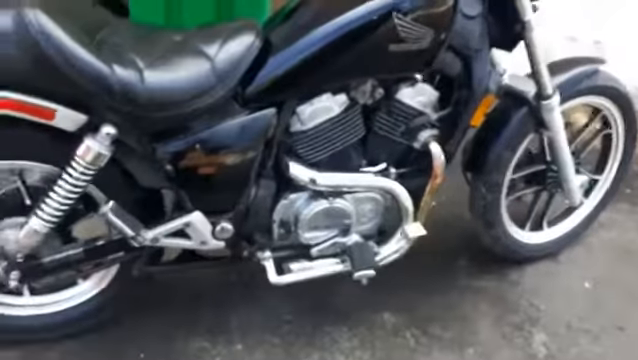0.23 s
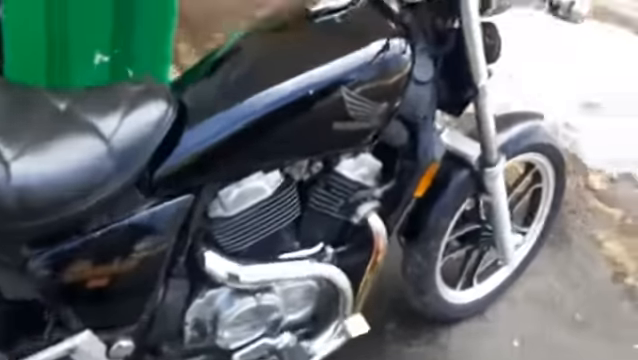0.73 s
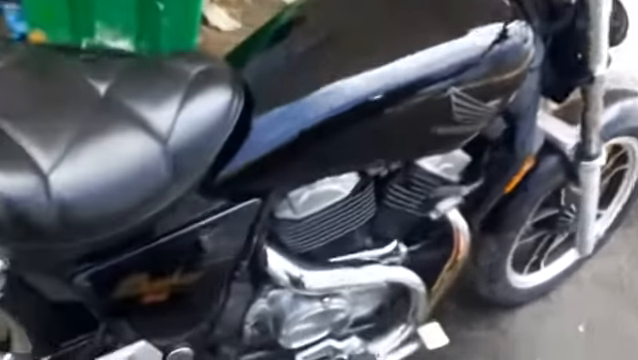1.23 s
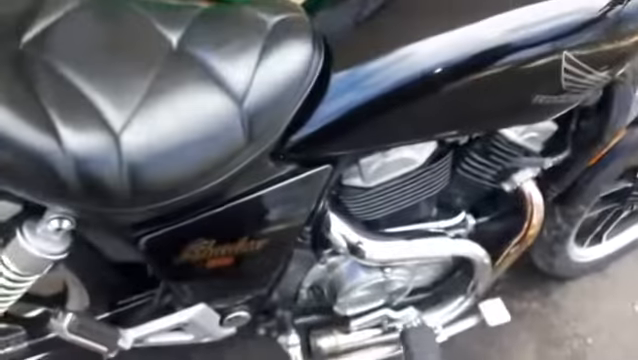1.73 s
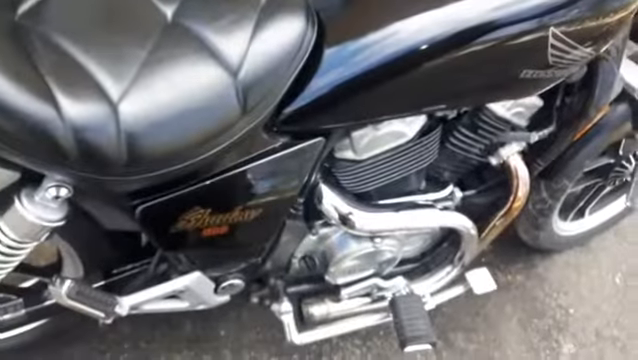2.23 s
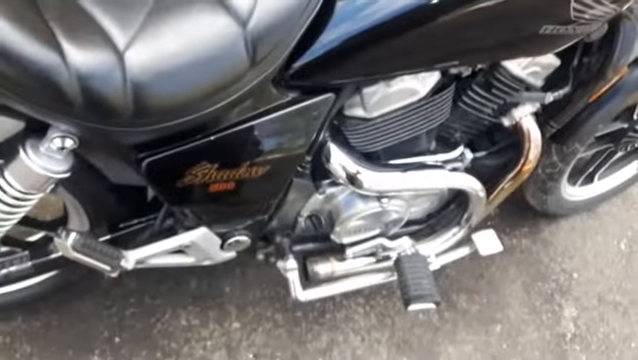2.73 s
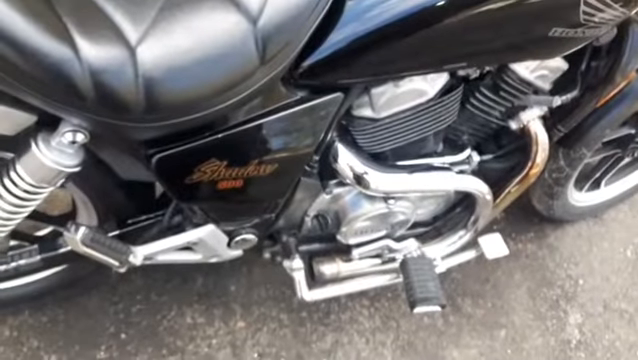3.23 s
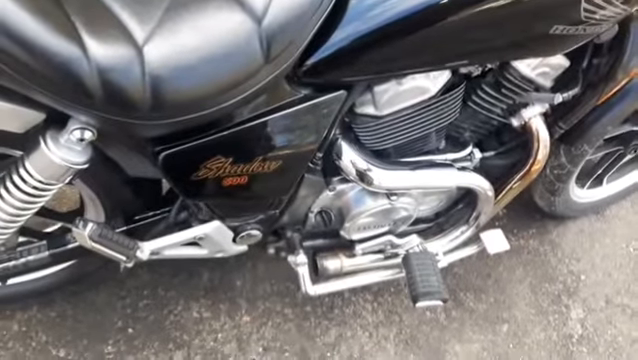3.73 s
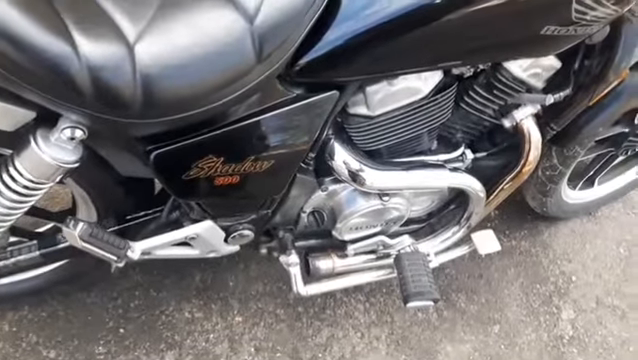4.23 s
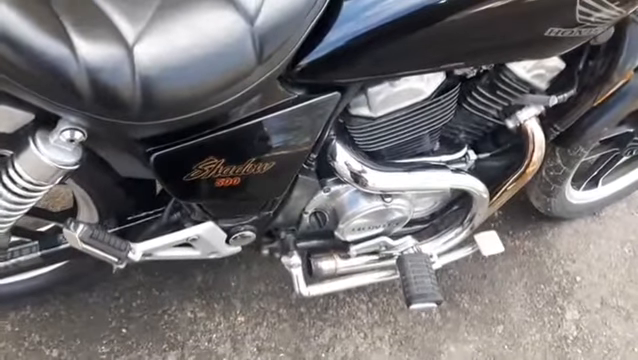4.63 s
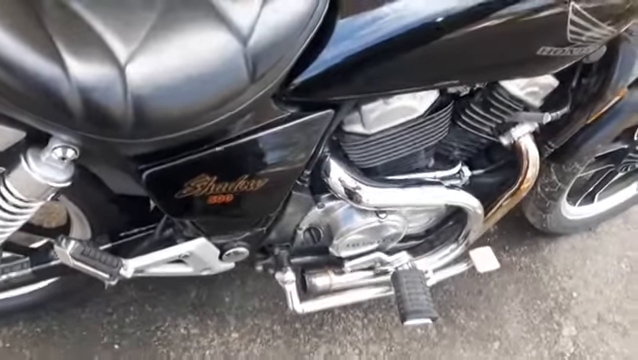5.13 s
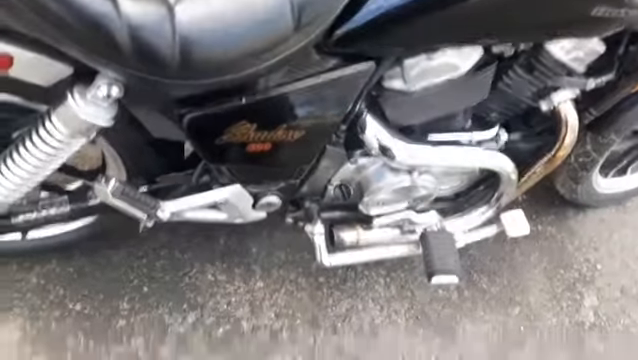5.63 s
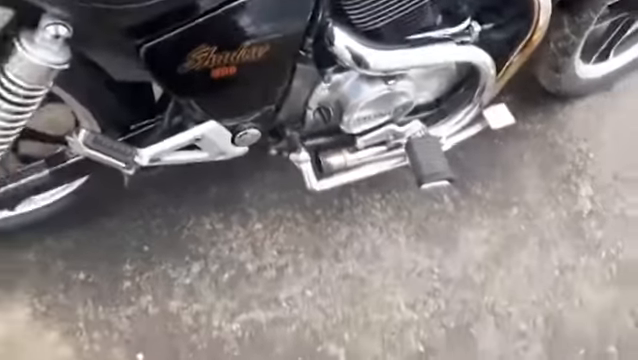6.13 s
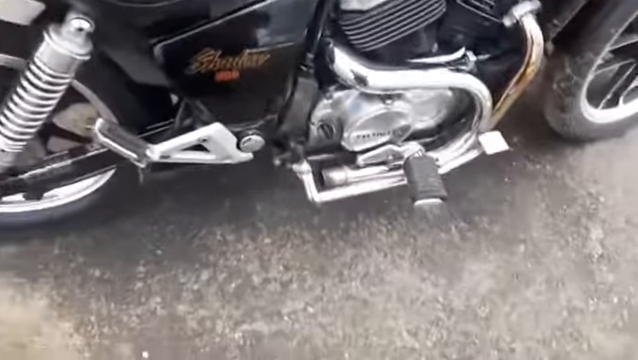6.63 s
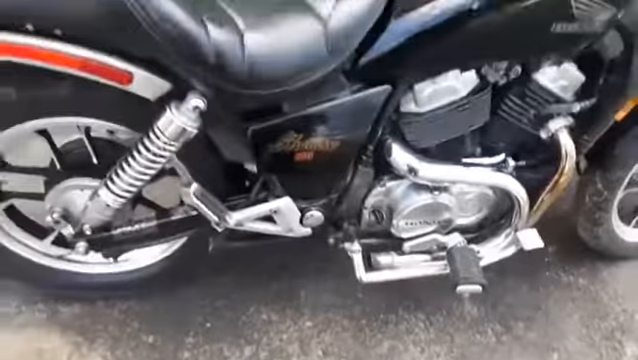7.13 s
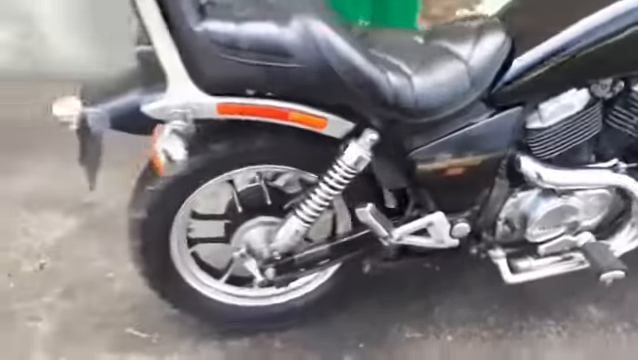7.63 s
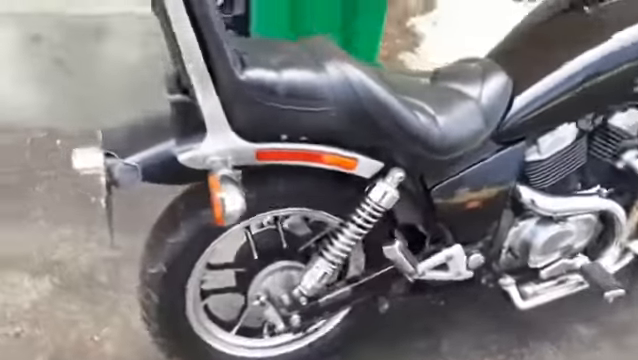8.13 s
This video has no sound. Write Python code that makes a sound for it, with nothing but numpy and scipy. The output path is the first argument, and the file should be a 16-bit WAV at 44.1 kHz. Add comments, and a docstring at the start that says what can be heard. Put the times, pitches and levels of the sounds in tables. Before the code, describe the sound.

A V-twin motorcycle on open pipes idles with a lumpy chug, gets a short throttle blip and one hard crackling rev, then settles back to idle.

```python
"""Outdoors, a V-twin motorcycle on open pipes idles, is blipped, revved once and coasts slowly back to idle.
Two unevenly spaced firings a cycle puff into the ringing pipes; gas hisses past the valves and the valve
gear clatters. Under throttle the puffs steepen into shocks that overload the close microphone, and the pipes
pop as it shuts. Pushes timed by the crank ring damped modes or gate coloured noise; a low rumble lies below."""
import sys
import numpy as np
from scipy import signal
from scipy.io import wavfile
from scipy.ndimage import uniform_filter1d

SR = 44100
rng = np.random.default_rng(int(sys.argv[2]) if len(sys.argv) > 2 else 0)


def wav_record(signal):
    """Record a signal, one row per channel, as 16-bit PCM in the file named by sys.argv[1]."""
    frames = np.transpose(np.atleast_2d(signal))
    bounded = np.clip(frames, -1, 1)
    # unit amplitude maps onto the largest positive 16-bit level
    quanta = np.round(bounded * 32767).astype(np.int16)
    wavfile.write(sys.argv[1], SR, quanta)


N = 369116
T = np.arange(N) / SR


def amp(db):
    """Decibels to gain."""
    return 10 ** (np.asarray(db) / 20)


def noise():
    """White turbulence."""
    return rng.standard_normal(N)


def ramp(x, start, end):
    """Rises from 0 to 1 as x goes from start to end."""
    return np.clip((x - start) / (end - start), 0, 1)


def follow(rows):
    """Each column of a curve table at every sample."""
    s, *columns = np.transpose(rows)
    return [np.interp(T, s, c) for c in columns]


# engine speed: (time [s], four-stroke cycles [1/s])
ENGINE_SPEED = [(0.0, 12.67), (0.9, 12.24), (1.31, 12.62), (1.59, 12.18), (2.05, 12.61), (2.32, 35.31),
                (2.61, 25.36), (2.72, 24.53), (2.9, 39.22), (3.04, 50.76), (3.13, 53.93), (3.41, 41.87),
                (3.67, 33.02), (4.05, 26.9), (5.0, 22.52), (6.24, 15.73), (6.71, 14.92), (8.37, 14.3)]
# twists of the throttle: (opening starts [s], shutting starts [s], afterfire ends [s])
TWISTS = [(2.055, 2.31, 2.563), (2.692, 3.152, 3.70)]
OPEN_S, SHUT_S = 0.069, 0.0488  # time the throttle takes to open and to shut
# cycles/s: coasting gives way to idle between the first two; shocks set in between the last two
IDLE_SPEED, COAST_SPEED, CRACK_SPEED, RIP_SPEED = 14.32, 22.6, 33, 45.5
MID_SPEED = 25  # cycles/s at which the running levels are stated
START_CYCLE, REAR_CYCLE = -.212, .325  # crank at the start; place of the rear firing [cycles]
SKIP_S, SKIP_CYCLES = 1.458, .318  # the sound skips once, about a third of a cycle ahead
LULL_AFTER_S, LULL_WIDTH_S = 0.077, .11  # the pipe note sags and sputters just after the afterfire ends

RATE = follow(ENGINE_SPEED)[0]
THROTTLE = sum(ramp(T, opens, opens + OPEN_S) - ramp(T, shuts, shuts + SHUT_S)
               for opens, shuts, _ in TWISTS)
# running on above idle with the throttle shut
OVERRUN = (1 - THROTTLE) * ramp(RATE, IDLE_SPEED, COAST_SPEED)
IDLING = (1 - THROTTLE) * (1 - OVERRUN)
# shares of coasting puffs and of shocks
COASTING = np.clip(0.13 + 0.68 * OVERRUN, 0, 1)
SHOCKED = np.clip(0.0049 + 0.93 * np.maximum(THROTTLE, ramp(RATE, CRACK_SPEED, RIP_SPEED)), 0, 1)
DRIVEN_SHOCK = SHOCKED * (1 - COASTING)
# at racing speed the separate firings merge into a train of shocks
RACING = ramp(RATE - 6 * THROTTLE, 34, 40)
LULL = sum(np.exp(-((T - ends - LULL_AFTER_S) / LULL_WIDTH_S) ** 2) for _, _, ends in TWISTS)
# the idle is lumpy: the crank runs a little early or late
HUNTING = uniform_filter1d(uniform_filter1d(noise(), size=SR // 10), size=SR // 20)
LUMPY = .005 * HUNTING / HUNTING.std() * (1 - OVERRUN - THROTTLE) ** 2
SKIP = SKIP_CYCLES * ramp(T, SKIP_S - .006, SKIP_S + .006)
# crank position in cycles
CYCLE = START_CYCLE + np.cumsum(RATE) / SR + SKIP + LUMPY


def clicks(s, size):
    """Single-sample pushes at the given times."""
    samples = np.clip(np.round(s * SR).astype(int), 0, N)
    return np.bincount(samples, size * (s > 0), N + 1)[:N]


SPUTTER_DB, SPUTTER_S = 4.5, .0006  # extra unevenness and jitter at the depth of the lull


def beats(place, uneven_db, jitter_s, late_s=0):
    """One push a cycle at a crank position; combustion is less even under throttle and while it sputters."""
    turns = np.arange(np.ceil(CYCLE[0] - place), CYCLE[-1] - place)
    s = np.interp(turns + place, CYCLE, T)
    rougher = 1 + 0.83 * np.interp(s, T, DRIVEN_SHOCK)
    slip, size = rng.standard_normal((len(s), 2)).T * rougher
    sputter = np.interp(s, T, LULL)
    s = s + late_s + (jitter_s + SPUTTER_S * sputter) * slip
    return clicks(s, amp((uneven_db + SPUTTER_DB * sputter) * size))


def die(x, decay_s):
    """Gives every push an exponential tail of unit area."""
    r = np.exp(-1 / (decay_s * SR))
    return signal.lfilter([1 - r], [1, -r], x)


def ring(x, modes, low_hz, high_hz):
    """Damped modes, kept to their own register; a wider mode dies faster."""
    t = T[:SR // 6]
    tone = sum(strength * width * np.exp(-np.pi * width * t) * np.cos(2 * np.pi * hz * t)
               for hz, width, strength in modes)
    register = signal.butter(3, [low_hz, high_hz], "band", fs=SR, output="sos")
    return signal.sosfilt(register, signal.oaconvolve(x, tone)[:N])


def colour(x, points):
    """Causal minimum-phase filter with the given spectrum, falling steeply beyond its ends."""
    hz, db = np.transpose(points)
    octave = np.log2(np.fft.rfftfreq(8192, 1 / SR) + 1)
    inside = np.clip(octave, np.log2(hz[0]), np.log2(hz[-1]))
    db = np.interp(octave, np.log2(hz), db) - 30 * abs(octave - inside)
    log_gain = np.log(amp(np.maximum(db, -100)))
    mirrored = np.r_[log_gain, log_gain[-2:0:-1]]
    taps = np.fft.ifft(np.exp(np.conj(signal.hilbert(mirrored)))).real
    return signal.oaconvolve(x, taps[:len(taps) // 2])[:N]


def steady(x):
    """Scales a sound to unit power over the two engine cycles around each moment."""
    first, last = np.interp(CYCLE - 1, CYCLE, T), np.interp(CYCLE + 1, CYCLE, T)
    energy = np.cumsum(x ** 2) / SR
    power = (np.interp(last, T, energy) - np.interp(first, T, energy)) / (last - first)
    return x / np.sqrt(power + 1e-20)


def mottle(x, depth_db):
    """Turbulence colours each puff its own way: random patches about 1 kHz wide and 25 ms long."""
    z = signal.stft(x, nperseg=128)[2]
    patches = uniform_filter1d(rng.standard_normal(z.shape[::-1]), size=16, axis=0)
    patches = uniform_filter1d(patches, size=3, axis=1).T
    return signal.istft(z * amp(depth_db * patches / patches.std()), nperseg=128)[1][:N]


def yard(x, wet_db, t60):
    """Scatter from the bike, the ground and nearby walls: sparse random echoes that die away."""
    t = T[:SR // 3]
    sparse = (rng.random(len(t)) < .1) * (t > .004)
    taps = rng.standard_normal(len(t)) * sparse * amp(-60 * t / t60)
    return x + amp(wet_db) * signal.oaconvolve(x, taps / np.linalg.norm(taps))[:N]


def loudness(idle_db, throttle_db, throttle_rise, coast_db, coast_rise):
    """A layer's level follows the throttle and changes with speed."""
    faster = RATE - MID_SPEED
    driven = THROTTLE * (throttle_db + throttle_rise * faster)
    coasting = OVERRUN * (coast_db + coast_rise * faster)
    return (1 - THROTTLE - OVERRUN) * idle_db + driven + coasting


# puffs of one cycle (valves open, pistons push, valves shut), under power and coasting:
# (place [cycles], signed push on boom [relative], on bark [relative], on bray [relative])
FIRING_PUFFS = [(-0.011, -0.71, -0.5, 0.056), (0.065, 0.29, -0.082, -0.042), (0.199, -1.07, 0.31, -0.012),
                (0.313, -0.41, -0.57, 0.18), (0.406, 0.41, -0.16, 0.2), (0.516, 0.27, -0.25, 0.14),
                (0.618, -0.17, -0.11, -0.075)]
COASTING_PUFFS = [(-0.011, -0.3, 0.55, -0.34), (0.065, 0.89, -0.29, 0.036), (0.199, 1, -0.25, 0.16),
                  (0.313, -0.29, 0.79, -0.77), (0.406, 0.66, -0.65, -0.47), (0.516, 0.14, 0.32, -0.54),
                  (0.618, 0.17, 0.11, 0.036)]
# pipe resonances, low to high: (frequency [Hz], width [Hz], signed strength at the mouth [relative])
BOOM_MODES = [(106.35, 9.8, -1.17), (135.6, 27, -0.88)]
BARK_MODES = [(179, 84.5, 1.277), (247, 134, -1.075), (307, 51, -0.12), (368.8, 36, 0.68)]
BRAY_MODES = [(471, 140, 1.54), (546.4, 9.3, 0.54), (598, 67, -0.33), (729.6, 11.5, 0.61), (940, 47, -0.22)]


def pipes(boom_db, bark_db, bray_db):
    """The puffs of each cycle ring the pipes; turbulence in the outflow roughens the upper modes."""
    push = np.zeros((3, N))
    for puffs, share in (FIRING_PUFFS, 1 - COASTING), (COASTING_PUFFS, COASTING):
        for place, *sizes in puffs:
            puff = beats(place, uneven_db=.7, jitter_s=.00003, late_s=-0.00401)
            push += np.outer(sizes, share * puff)
    swirl = die(abs(push[2]), decay_s=.008) * noise() * (1 + 1.5 * DRIVEN_SHOCK)
    boom = ring(push[0], BOOM_MODES, low_hz=82.0, high_hz=205.6)
    bark = ring(push[1] + 1.2 * swirl, BARK_MODES, low_hz=162, high_hz=425)
    bray = ring(push[2] + .45 * swirl, BRAY_MODES, low_hz=387, high_hz=860)
    bray = (1 - 0.5 * IDLING) * (1 - 0.99 * RACING) * steady(bray) + 0.67 * IDLING * overtones()
    low = amp(boom_db - 1.7 * RACING) * steady(boom) + amp(bark_db - 2 * RACING) * steady(bark)
    return low + amp(bray_db) * steady(bray)


# narrow pipe overtones at idle:
# (frequency when hot [Hz], width [Hz], strength before the revs [relative], strength after [relative])
OVERTONES = [(444, 24, 0.041, 0.28), (532, 37, 0.97, 0.93), (622.7, 22, 0.91, 0.64), (740, 35, 0.21, 0.47),
             (856, 16, 0.21, .21)]
COOL_PITCH = 0.921  # pitch of the cooler pipes as a ratio to hot


def overtones():
    """The rear cylinder and the shutting valves leave hollow notes ringing, sharper once the pipes are hot."""
    push = sum(size * beats(place, uneven_db=3.5, jitter_s=.00004)
               for place, size in [(.3, 0.83), (.45, 0.44), (.565, 0.51)])
    cool_modes = [(hz * COOL_PITCH, width, before) for hz, width, before, _ in OVERTONES]
    hot_modes = [(hz, width, after) for hz, width, _, after in OVERTONES]
    cool = ring(push, cool_modes, low_hz=407, high_hz=960)
    hot = ring(push, hot_modes, low_hz=400, high_hz=920)
    heat = ramp(T, TWISTS[0][0], TWISTS[-1][-1])
    return steady((1 - heat) * cool + heat * hot)


# rising notes of the exhaust strokes, levels before the drift: (start [cycles], length [cycles],
# from [Hz], to [Hz], idle level [dB], coasting level at MID_SPEED [dB])
SWOOPS = [(-.08, 0.25, 281, 512, -42.5, -31), (0.199, 0.501, 449, 760, -50, -31.5),
          (0.281, 0.452, 292, 530, -39, -28.5), (.37, 0.38, 527.5, 659, -35.5, -34),
          (.45, 0.38, 1000, 1233, -54.5, -45.5)]


def swoops(rise_db=0.25, driven_db=-3, uneven_db=1.5):
    """The rising piston shrinks the open cylinder, so its hollow notes glide up through each exhaust stroke."""
    out = np.zeros(N)
    for place, length, from_hz, to_hz, idle_db, coast_db in SWOOPS:
        crank = CYCLE - place
        stroke = np.minimum(crank % 1 / length, 1)
        turns = np.cumsum(from_hz + (to_hz - from_hz) * stroke) / SR
        # every stroke starts its note at the same phase
        turns -= np.interp(np.floor(crank), crank, turns)
        size_db = uneven_db * rng.standard_normal(size=400)[np.floor(crank).astype(int)] * (1 - OVERRUN)
        note = steady(np.sin(np.pi * stroke) ** 2 * np.sin(2 * np.pi * turns))
        level_db = loudness(idle_db, coast_db + driven_db, rise_db, coast_db, rise_db)
        out += note * amp(size_db + level_db)
    return out


# colours of the shocks and of the torn gas behind them: (frequency [Hz], level [relative dB])
SHOCK_COLOUR = [(300, -16), (600, 5), (1000, 1.5), (1400, 1), (2000, -5), (3000, -16.5), (6000, -11.5),
                (16000, -14.5)]
RASP_COLOUR = [(700, 11), (1500, -3), (3000, -4), (5000, -8.5), (8000, -5.5), (12000, -10.5), (16000, -12)]


def blast(shock_db, rasp_db, round_trip_s=0.0043, echo=0.053):
    """Each blowdown leaves as a shock, bounces along the pipe, and drags a rasping jet behind it."""
    shocks = np.zeros(N)
    for trip in range(4):
        for place in 0, REAR_CYCLE:
            bounce = np.clip(echo + 0.86 * COASTING, 0, 1) ** trip
            shocks += bounce * beats(place, uneven_db=-1.5, jitter_s=.00005, late_s=trip * round_trip_s)
    firing = 0.52 * beats(0, uneven_db=3.5, jitter_s=.0001)
    firing += beats(REAR_CYCLE, uneven_db=5.5, jitter_s=.0001)
    burst = die(die(firing, decay_s=0.00025), decay_s=0.00023)
    burst += (0.59 + 0.48 * COASTING) * die(firing, decay_s=0.0053)
    # noise on the level itself makes the jet spiky
    jet = steady(burst * noise() * amp(7.4 * noise()))
    crack = yard(colour(steady(shocks) + 0.87 * jet, SHOCK_COLOUR), wet_db=-11.5, t60=0.048)
    rasp = yard(colour(jet, RASP_COLOUR), wet_db=-10.0, t60=0.021)
    return amp(shock_db) * steady(crack) + amp(rasp_db - 1.5) * steady(rasp)


# shocks of one cycle at high speed:
# (place [cycles], size under throttle [relative], size coasting [relative])
RIP_SHOCKS = [(0, 0.89, 0.1), (0.231, 0.066, 0.46), (0.34, 0.58, 0.078), (.52, 0.53, 1), (.63, .15, .45),
              (.77, 0.42, 0.25)]
# colours of the wave and of its spit: (frequency [Hz], level [relative dB])
RIP_COLOUR = [(200, -23), (380, -17), (580, 11), (720, 2.5), (920, 3), (1080, -5), (1300, 2), (2000, -6.5),
              (3500, -10.5), (8000, -8.5), (16000, -9)]
RIP_SPIT_COLOUR = [(900, -8), (1600, -2), (3000, -2), (5500, -5), (8500, 1.5), (12000, -6), (16000, -14)]


def rip(top_db=-13.5, top_speed=52, db_per_speed=0.17, coast_db=0.5, bounce=0.17, bounce_s=0.00108):
    """At speed the pipe wave breaks into the same few spitting shocks a cycle: a pitched, crackling roar."""
    shocks = np.zeros(N)
    for place, driven, coasting in RIP_SHOCKS:
        size = THROTTLE * driven + (1 - THROTTLE) * coasting
        shocks += size * beats(place, uneven_db=3.2, jitter_s=.00003)
    wave = colour(-shocks - bounce * np.interp(T - bounce_s, T, shocks), RIP_COLOUR)
    spit = steady(colour(die(shocks, decay_s=.0008) * noise(), RIP_SPIT_COLOUR))
    level_db = top_db + db_per_speed * (RATE - top_speed) + coast_db * (1 - THROTTLE)
    return RACING * amp(level_db) * (.8 * steady(wave) + .45 * spit)


# colour of a shock front: (frequency [Hz], level [relative dB])
FRONT_COLOUR = [(300, 0), (700, 1), (1200, 1.5), (2000, -1.5), (4000, -8.5), (8000, -13.5), (16000, -20)]


def front(push, bounce=0.26, bounce_s=0.00088):
    """A shock front: a sudden pressure step that swings back, doubled by a bounce off the ground."""
    return -colour(push + bounce * np.interp(T - bounce_s, T, push), FRONT_COLOUR)


# firings heard one by one as the throttle opens:
# (time [s], spit level [relative dB], body level [relative dB])
FIRINGS = [(2.0983, -4, -14), (2.137, -1, -11), (2.1503, 5.5, -2.5), (2.18, -8, -14), (2.193, -12.5, -14.5),
           (2.2195, -7, -4.5), (2.232, -9, -7), (2.255, -11, -5), (2.2644, -8, -7), (2.2876, -13, -21),
           (2.2957, 1, -2.5), (2.3161, -13, -29), (2.327, -11, -25), (2.736, -10.5, -16.5),
           (2.7465, 0, -1.5), (2.772, 14, -20), (2.7816, -3, -14), (2.806, -9, -14), (2.814, 7, -6),
           (2.836, 1, -11), (2.8447, -5, -1.5), (2.863, -6, -7), (2.8724, 5, -11), (2.8904, -4, -7),
           (2.899, 5, -6), (2.915, 3, -13), (2.924, 1, -10), (2.9396, 3, -9), (2.947, 5, -13),
           (2.9619, -4, -8), (2.97, 7, -3)]


def cracks(body_db=7.5, spit_db=-8.5, step=5, step_s=0.001487, tail=0.13, tail_s=0.0085):
    """Each hard firing leaves the pipe as a shock front, a burst of torn gas and a short tail."""
    burst_s = .0019
    s, spits_db, bodies_db = np.transpose(FIRINGS)
    body, spit = clicks(s, amp(bodies_db + body_db)), clicks(s, amp(spits_db + spit_db))

    def torn(x):
        """Turbulent gas: a noise burst with a weaker, longer tail."""
        return SR * (burst_s * die(x, burst_s) + tail * tail_s * die(x, tail_s)) * noise()

    shock = front(step * np.interp(T - step_s, T, body))
    return yard(colour(torn(body), SHOCK_COLOUR) + shock + colour(torn(spit), RASP_COLOUR),
                wet_db=-17, t60=0.04)


# the loudest single bangs, hard shocks of the rev and afterfire pops:
# (time [s], shock level [relative dB], trailing spit level [relative dB])
HARD_BANGS = [(2.0815, -21, -3), (2.357, -17, -10), (2.7102, -6.5, -1), (2.9854, 2, -2), (3.006, 3, -4),
              (3.0311, 4, 2), (3.0365, 1, -8), (3.042, -1, -12), (3.0462, 5, -9), (3.0623, 4, -12),
              (3.066, 2, -9), (3.0765, -1, -8), (3.0855, 8, -7), (3.094, 1, -10), (3.1, -15, -10),
              (3.105, -4, -12), (3.1192, -4, -9), (3.1238, 2, -8), (3.1346, 1, -9), (3.1425, 5, -13),
              (3.1488, -11, -9), (3.1648, 0, -12), (3.171, -3, -2), (3.185, 2, -14), (3.1877, 0, -10),
              (3.1948, -9, -6), (3.202, -3, -12), (3.2038, -1, -10), (3.21, 3, -7), (3.2243, 4, -14),
              (3.2301, -3, -6), (3.245, -3, -14), (3.266, -1, -14), (3.3379, -4, -11), (3.3572, -5, -6),
              (3.3625, -3, -2), (3.3825, -6, 3), (3.3969, -3, -12), (3.4053, -11, -9), (3.494, -13, 4),
              (3.5758, 9, 9), (3.6119, -14, 8), (3.677, -15, 4.5), (3.723, -20, -7), (3.787, -15, -7),
              (3.852, -24, -18)]


def hard_bangs(bang_db=-1.0):
    """The loudest single bangs: hard shocks of the rev and afterfire pops, each with a short spit."""
    s, shock_db, spit_db = np.transpose(HARD_BANGS)
    spit = die(clicks(s, amp(spit_db)), decay_s=0.0011) * noise()
    return amp(bang_db) * (front(14 * clicks(s, amp(shock_db))) + colour(48 * spit, SHOCK_COLOUR))


def afterfire(shock_db=-2, spit_db=6.5, place=0.67, catch_s=0.09, fade_s=0.028):
    """After the throttle shuts, unburnt fuel goes off once a cycle in the hot pipes, until it is used up."""
    burning = sum(ramp(T, shuts, shuts + catch_s) * (1 - ramp(T, ends - fade_s, ends))
                  for _, shuts, ends in TWISTS)
    bangs = burning * beats(place, uneven_db=1, jitter_s=0.00032)
    spit = die(amp(spit_db) * bangs, decay_s=0.0022) * noise()
    return yard(colour(10 * amp(shock_db) * bangs + 64 * spit, SHOCK_COLOUR), wet_db=-8.0, t60=0.098)


def misfire(at_s=3.577, width_s=0.027, depth=0.92):
    """One cycle fails to fire and leaves a hole in the level; its fuel becomes the loudest pop."""
    return 1 - np.clip(depth, 0, 1) * np.exp(-((T - at_s) / width_s) ** 2)


# colour of the whirr: (frequency [Hz], level [relative dB])
WHIRR_COLOUR = [(700, 3), (850, 3.5), (1050, -1.5), (1450, -1.5), (1850, -5), (2300, -7.5), (2650, -25),
                (3000, -24.5), (4200, -24)]
# crankcase and cylinder fins: (frequency [Hz], width [Hz],
# strength from the first position [relative], strength from closer by [relative])
CASE_MODES = [(1152, 24, 0.43, 0.74), (1263, 40, 0.94, 0.069), (1384, 54, 1, 1), (1577, 44, .8, 0.49),
              (2142, 70, 0.059, 0.46), (2425, 31, 0.054, 0.56)]


def clatter(case_share=0.52, whirr_floor=0.75, moved_s=2.5):
    """Rockers tap four times a cycle and ring the engine case, over the whirr of chains and gears."""
    taps = sum(size * beats(place, uneven_db=3.5, jitter_s=0.00048)
               for place, size in [(-.02, 0.95), (.3, 1), (.4, 0.47), (.56, 0.44)])
    whirr = steady(colour((steady(die(taps, decay_s=0.017)) + whirr_floor) * noise(), WHIRR_COLOUR))
    whirr = steady(mottle(whirr, depth_db=2.5))
    first_modes = [(hz, width, far) for hz, width, far, _ in CASE_MODES]
    later_modes = [(hz, width, near) for hz, width, _, near in CASE_MODES]
    first = ring(taps, first_modes, low_hz=890, high_hz=2780)
    later = ring(taps, later_modes, low_hz=890, high_hz=2840)
    moved = ramp(T, 0, moved_s)
    return steady(whirr + case_share * steady((1 - moved) * first + moved * later))


# hiss colours beside and behind the bike: (frequency [Hz], level [relative dB])
HISS_BESIDE = [(1650, -31), (2650, 2), (3010, -16), (3380, -4), (3670, -12), (4090, -1), (5680, -3),
               (8000, 1), (9600, 0.5), (11000, -5), (13300, -10), (15200, -6), (16000, 5.5)]
HISS_BEHIND = [(1650, -9), (2800, -13.5), (3310, -17.5), (3670, -17), (3920, -30), (4120, -45), (4430, -41),
               (5170, -22.5), (6380, -18.5), (7600, -6.5), (8670, -1.5), (11100, -22), (14300, -28),
               (15200, -10), (16000, -39)]
# how far the microphone is toward the back of the bike: (time [s], share [0-1])
BEHIND = [(0, 0.25), (.45, 0.92), (.95, 0.04), (5.8, 0), (6.82, 0.92)]


def hiss():
    """Gas leaks, then jets past each opening valve; the colour shifts as the microphone moves behind the bike."""
    leak = die(beats(0, uneven_db=4.0, jitter_s=0.00027, late_s=-0.0066), decay_s=0.0013)
    front_jet = die(beats(0, uneven_db=2.0, jitter_s=0.00037, late_s=-0.0021), decay_s=0.0027)
    rear_jet = die(beats(REAR_CYCLE, uneven_db=-0.5, jitter_s=0.00095, late_s=-0.0014), decay_s=0.0017)
    flow = die(0.15 * leak + front_jet + rear_jet, decay_s=0.0019)
    jet = yard(steady(flow * noise()), wet_db=-18, t60=0.13)
    # a constant stream fills the gaps, more of it when coasting
    jet = mottle(jet + (0.05 + 0.3 * COASTING) * noise(), depth_db=3)
    behind = np.clip(follow(BEHIND)[0], 0, 1)
    return steady((1 - behind) * colour(jet, HISS_BESIDE) + behind * colour(jet, HISS_BEHIND))


# colour of the low air noise: (frequency [Hz], level [relative dB])
RUMBLE_COLOUR = [(8, -13), (25, -36), (45, -0.5), (65, -5), (120, -20), (400, -46)]


def rumble():
    """Low air noise at unit power, for the buffet of the blasts and for the background."""
    return steady(colour(noise(), RUMBLE_COLOUR))


# layer levels before drift and trims: (idle [dB], under throttle at MID_SPEED [dB],
# its rise [dB per cycle/s], coasting at MID_SPEED [dB], its rise [dB per cycle/s])
BOOM_DB = (-11.5, -19, 0.19, -14, 0.11)
BARK_DB = (-19, -19, 0.17, -18.5, 0.32)
BRAY_DB = (-30, -22.5, 0.34, -21, 0.35)
CLATTER_DB = (-37, -28, 0.91, -40, 0.7152)
HISS_DB = (-36.5, -35, 1.12, -44, 0.54)
SHOCK_DB = (-32, -21.5, 0.49, -34, 0.75)
RASP_DB = (-29.5, -26, 0.33, -33, 0.91)
# slow drift of the levels as the microphone moves and the pipes resonate near 17 cycles/s:
# (time [s], boom [dB], bark [dB], bray [dB], clatter [dB], hiss [dB])
DRIFT = [(0, 0.7, 1.7, -7, 3.5, 1.5), (1.3, 1, 0.6, 2, 2, 1.7), (2.099, 0.5, 0.5, -1, 2.5, 3),
         (4.403, 1, 1.5, 0.95, -1, -2.5), (5.298, 0, -2.5, -1.5, 1.5, 3), (5.9, -1, 3, 5.5, 1, 4),
         (7.203, -4.5, -2, -3, 0, -3), (7.901, -3.5, 1, -4.5, -1, 3), (8.37, -4.5, 0, -5, -1.5, -1.5)]


def scene():
    """The engine, heard from one close microphone, with a low buffet while the pipes blast."""
    drifts = follow(DRIFT)
    layers = [BOOM_DB, BARK_DB, BRAY_DB, CLATTER_DB, HISS_DB]
    boom_db, bark_db, bray_db, clatter_db, hiss_db = (
        loudness(*layer) + drift for layer, drift in zip(layers, drifts))
    shock_db, rasp_db = loudness(*SHOCK_DB), loudness(*RASP_DB)
    lull_db = -3.5 * LULL
    exhaust = pipes(boom_db + lull_db, bark_db + 0.57 * lull_db, bray_db + 0.089 * lull_db)
    # the gliding notes drift with the bray and thin out at racing speed
    exhaust = exhaust + (1 - 0.84 * RACING) * amp(0.84 * drifts[2]) * swoops()
    calm = amp(clatter_db) * clatter() + amp(hiss_db) * hiss()
    separate = 1 - RACING * (.62 + .22 * THROTTLE)
    buffet_db = shock_db - 7.5 + 4.5 * THROTTLE - 0.24 * (RATE - MID_SPEED)
    loud = separate * blast(shock_db, rasp_db) + rip() + amp(buffet_db) * rumble()
    air = amp(-37.5 - 18 * COASTING) * rumble()
    running = exhaust + np.sqrt(1 - SHOCKED) * calm + np.sqrt(SHOCKED) * loud + separate * afterfire()
    engine = misfire() * running + cracks() + hard_bangs() + air
    return np.array([engine, engine])


def record(dry, ceiling=0.84, edge_hz=16000):
    """The microphone overloads smoothly on the peaks; then a low-pass sets the band limit."""
    clipped = dry / (1 + (dry / ceiling) ** 8) ** (1 / 8)
    band_limit = signal.firwin(511, edge_hz, window=("kaiser", 8), fs=SR)
    return signal.oaconvolve(clipped, band_limit[None], "same")


dry = scene()
out = record(dry)
wav_record(out)
```